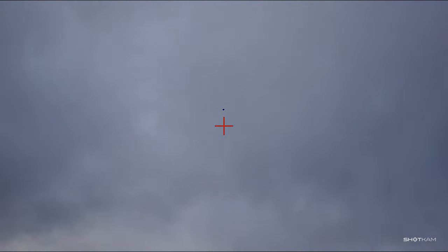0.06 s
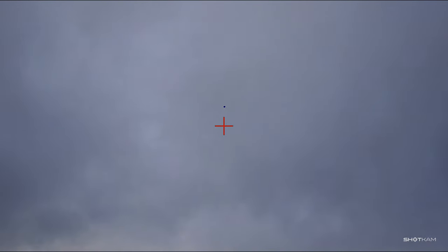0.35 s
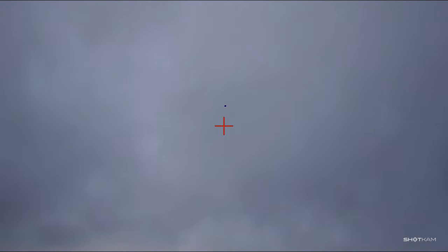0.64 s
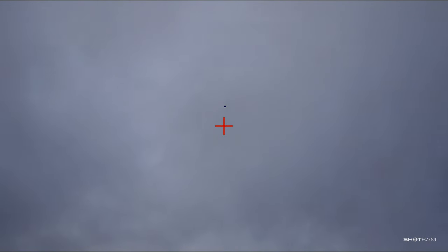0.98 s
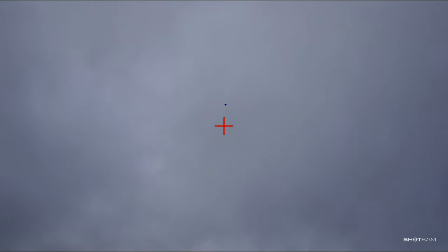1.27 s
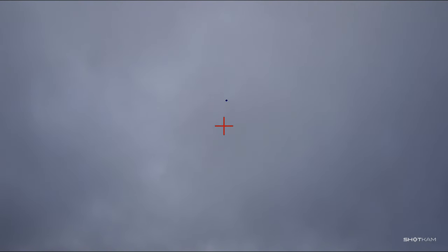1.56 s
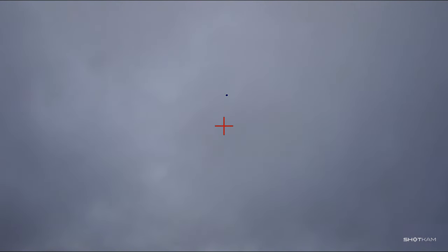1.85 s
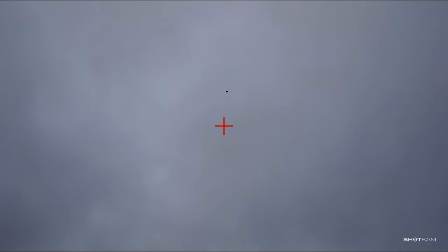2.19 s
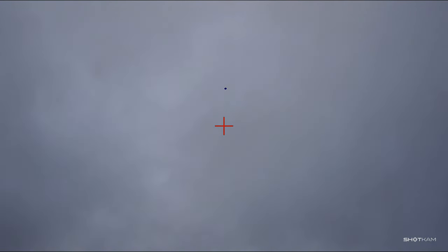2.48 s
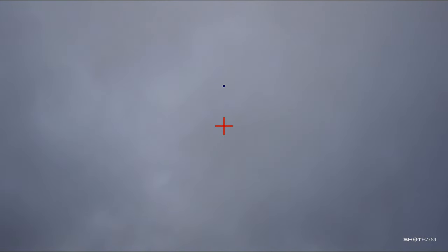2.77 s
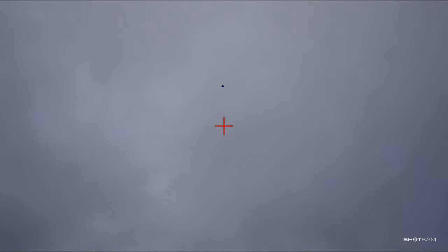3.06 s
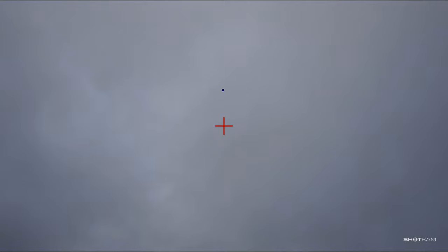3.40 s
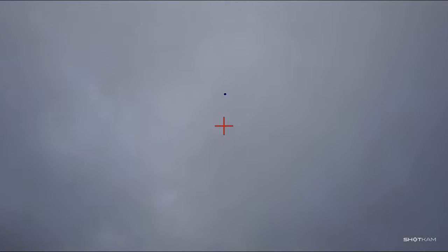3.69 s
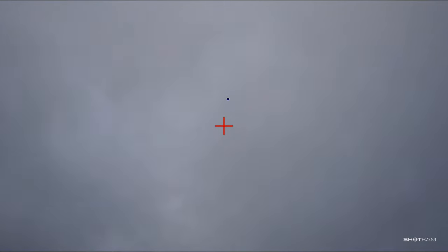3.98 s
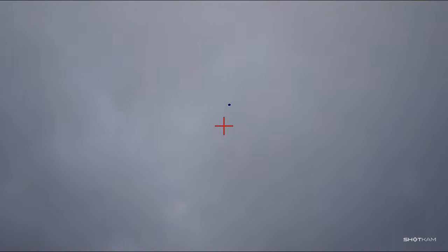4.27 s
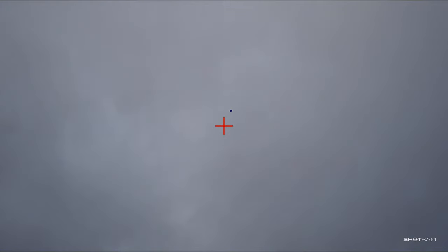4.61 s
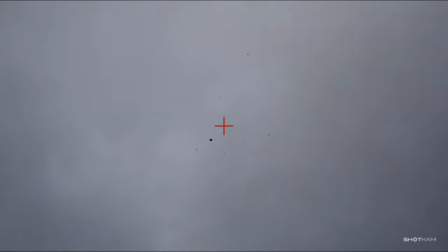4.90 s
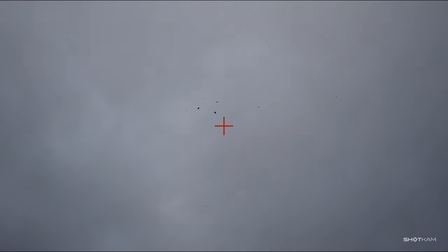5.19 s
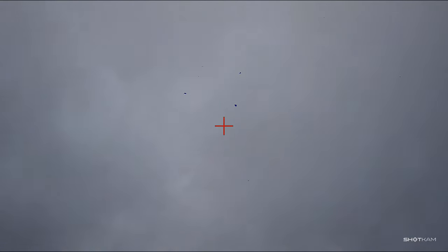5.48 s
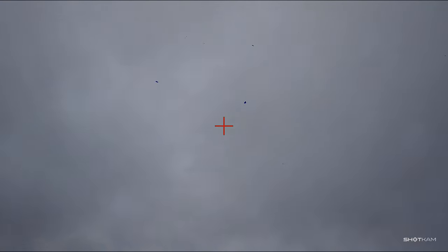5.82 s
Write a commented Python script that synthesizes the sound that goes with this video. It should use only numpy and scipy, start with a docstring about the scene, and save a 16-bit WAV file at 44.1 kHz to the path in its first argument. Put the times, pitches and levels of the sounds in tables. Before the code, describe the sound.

For the first five seconds or so it is very quiet outdoors: only faint, irregular puffs of wind rumbling on the microphone, with a low hum that swells and fades along with them. The microphone sits right on the barrel of a shotgun. At about 5 seconds the gun fires once, a sudden, very loud blast that overloads and distorts, with a deep recoil thump and a quick metallic rattle packed into it. A thin metallic ring from the barrel hangs on for nearly a second, while the report echoes over open land and comes back as a dull, distant roll. From about 5.2 seconds the wind and hum return slightly stronger beneath the fading echo. At around 5.8 seconds the gun's action gives one short clack, much weaker than the shot.

```python
"""Faint puffs of wind and a low hum, then one shotgun shot in open country.
The microphone is in a small camera clamped to the barrel; wind buffets it and hums in the clamp.
The hammer falls, and blast and recoil overload the input. The barrel rings on over the echo
of the land, and the action clacks once more."""
import sys
import numpy as np
from scipy import signal
from scipy.fft import rfft, irfft, next_fast_len
from scipy.io import wavfile

SR = 44100
rng = np.random.default_rng(int(sys.argv[2]) if len(sys.argv) > 2 else 0)


def int16_out(signal):
    """Quantize to a 16-bit WAV file."""
    q = np.round(np.clip(np.atleast_2d(signal).T, -1, 1) * 32767)
    wavfile.write(sys.argv[1], SR, q.astype(np.int16))


N = 257984
SHOT_S = 4.9555
AGE_S = np.arange(SR) / SR  # time since a blow


def amp(db):
    """Decibels to gain."""
    return 10 ** (np.asarray(db) / 20)


def along(points, hz):
    """Interpolate (f/Hz, value) points on a log frequency axis."""
    f, v = np.transpose(points)
    return np.interp(np.log(hz + 1), np.log(f), v)


def filtered(x, response):
    """Zero-phase filter with gain response(hz)."""
    size = next_fast_len(len(x) + SR // 2)
    hz = np.fft.rfftfreq(size, 1 / SR)
    return irfft(rfft(x, size) * response(hz), size)[:len(x)]


def noise(spectrum, size):
    """Coloured noise of rms 1; the spectrum sets its shape only."""
    x = filtered(rng.standard_normal(size), lambda hz: amp(along(spectrum, hz)))
    return x / np.sqrt(np.mean(x ** 2) + 1e-20)


def rise(rise_s):
    """Smooth onset from 0 to 1."""
    return 1 - np.exp(-(AGE_S / rise_s) ** 2)


def fade(t60_s):
    """Decay of 60 dB in t60_s."""
    return np.exp(-np.log(1000) * AGE_S / t60_s)


def ring(modes):
    """Free ringing of a struck part: a sum of damped sines."""
    return sum(amp(db) * fade(t60_s) * np.sin(2 * np.pi * hz * AGE_S) for hz, db, t60_s in modes)


def at(start_s, sound):
    """Place a sound on the scene's timeline."""
    return np.pad(sound, (round(start_s * SR), N))[:N]


def wind(breeze_db=-79, attack_s=0.028, buffet_fall_db_per_s=94, hum_fall_db_per_s=89):
    """Puffs on the swinging gun swell, hold and die, buffeting the port and humming in the clamp."""
    # puffs of air: start/s, length/s, buffet/dB, hum/dB
    gusts = [(-0.04, 0.79, -52.5, -63), (0.34, 0.087, -50, -50.5), (0.969, 0.3, -62, -59.5),
             (1.317, 0.11, -52, -64), (1.551, 0.33, -56.5, -61), (2.589, 0.18, -62, -82.5),
             (2.75, 0.36, -58.5, -91.5), (3.066, 0.31, -52.5, -84.5), (3.453, 0.068, -57, -100),
             (3.739, 0.13, -48, -66), (4.016, 0.079, -45, -71), (4.463, 0.054, -61, -105),
             (5.21, 0.15, -45, -42.5), (5.43, 0.09, -43.5, -41.5), (5.547, 0.082, -39.5, -50.5)]
    # turbulence at the microphone port: f/Hz, level/dB
    buffet_spectrum = [(5, -4.5), (12, -2), (25, -5.5), (45, -10.5), (80, -27.5), (120, -45), (250, -73),
                       (500, -120)]
    # clamp hum: f/Hz, level/dB
    hum_spectrum = [(60, -37.5), (110, -11.5), (150, -8.5), (180, 7.5), (200, -1.5), (235, -44), (320, -61),
                    (600, -120)]
    t = np.arange(N) / SR
    buffet, hum = np.full(N, amp(breeze_db)), np.zeros(N)
    for start_s, length_s, buffet_db, hum_db in gusts:
        swell = np.clip((t - start_s) / attack_s, 0, 1) ** 2
        since_end_s = np.maximum(t - start_s - length_s, 0)
        buffet = np.maximum(buffet, swell * amp(buffet_db - buffet_fall_db_per_s * since_end_s))
        hum = np.maximum(hum, swell * amp(hum_db - hum_fall_db_per_s * since_end_s))
    return buffet * noise(buffet_spectrum, N) + hum * noise(hum_spectrum, N)


def action(scrape_t60_s=0.042, thud_db=-13, thud_t60_s=0.12, contact_s=0.00085):
    """Each contact rings the action, thuds through the stock and adds a short scrape of steel."""
    # single contacts in lock and action: t/s, knock/dB, scrape/dB
    contacts = [(.378, -68, -120), (4.9408, -18, -34), (4.9475, 1.5, -36), (4.9565, 10, 3), (5.0185, -7, 5),
                (5.108, -27, -68), (5.692, -53.5, -77)]
    # action modes: f/Hz, level/dB, t60/s
    modes = [(246.5, -15, 0.15), (375, -12, 0.01), (445, -15.5, 0.049), (566.5, -6.5, 0.056),
             (636.6, 1.5, 0.053), (750, -14, 0.091), (930, -23, 0.07), (1770, -28.5, 0.034),
             (2130, -26, 0.054), (2680, -32.5, 0.082), (3570, -35.5, .035), (4280, -39.5, 0.049),
             (5554, -41, 0.025)]
    # stock thud: f/Hz, level/dB
    thud_spectrum = [(150, -5.5), (600, 3.5), (850, -2), (1400, -21.5), (1900, -12.5), (2800, -26),
                     (4000, -41.5), (7000, -64)]
    # steel scrape: f/Hz, level/dB
    scrape_spectrum = [(150, -16.5), (600, 1), (1000, 13.5), (1450, -12), (2200, 1), (3200, -6.5),
                       (4500, -6), (7000, -17), (10000, -47)]
    ringing = ring(modes)
    out = np.zeros(N)
    for t_s, knock_db, scrape_db in [*contacts, *chatter()]:
        knock = ringing + amp(thud_db) * fade(thud_t60_s) * noise(thud_spectrum, SR)
        scrape = fade(scrape_t60_s) * noise(scrape_spectrum, SR)
        out += at(t_s, rise(contact_s) * (amp(knock_db) * knock + amp(scrape_db) * scrape))
    return out


def jolts(contact_s=0.00039):
    """Handling and recoil ring the camera housing and, lower in pitch, its clamp."""
    # blows to the camera: t/s, housing/dB, clamp/dB
    blows = [(.379, -105, -62), (4.9555, 5, -1.5), (4.9632, 18, -4.5), (4.973, 22, -4.5), (4.9905, 22, -2),
             (5.0105, -16.5, 7), (5.2245, -23.5, -34)]
    # housing modes: f/Hz, level/dB, t60/s
    housing_modes = [(838, -14, 0.02), (981.3, 1.5, 0.028), (1028, -11, 0.016), (1281, -21.5, 0.077),
                     (2000, -27, 0.043)]
    # clamp modes: f/Hz, level/dB, t60/s
    clamp_modes = [(78, -8.5, 0.19), (177.4, 3.5, 0.13), (247, -6, 0.049), (290.7, -11, 0.052),
                   (379.2, -12.5, 0.072)]
    housing = rise(contact_s) * ring(housing_modes)
    clamp = rise(contact_s) * ring(clamp_modes)
    return sum(at(t_s, amp(housing_db) * housing + amp(clamp_db) * clamp)
               for t_s, housing_db, clamp_db in blows)


def shot(blast_db=15, blast_t60_s=0.13, kick_s=4.977):
    """The muzzle blast roars and rings the barrel; then the gun kicks into the shoulder."""
    # muzzle blast: f/Hz, level/dB
    blast_spectrum = [(30, -10), (110, -2), (200, 1.5), (280, 5), (420, -2.5), (700, -18.5), (1200, -18.5),
                      (3000, -22.5), (7000, -28.5), (12000, -56.5)]
    # barrel modes: f/Hz, level/dB, t60/s
    barrel_modes = [(1132.7, -12.5, 0.91), (1130, -19, 0.65), (610, -31, 0.3), (835, -43, .5),
                    (950, -41.5, 0.44), (2300, -57, .9), (2696, -56.5, .65)]
    # whole gun kicking back: f/Hz, level/dB, t60/s
    kick_modes = [(27.3, 21.5, 0.1), (40.2, 3, 0.28)]
    blast = amp(blast_db) * fade(blast_t60_s) * noise(blast_spectrum, SR)
    return at(SHOT_S, blast + ring(barrel_modes)) - at(kick_s, ring(kick_modes))


def echo(level_db=-36):
    """Nearby land scatters the report back; each band decays at its own rate."""
    # scattered report: f/Hz, level/dB
    spectrum = [(40, -5), (280, 2), (420, -7.5), (600, -13.5), (760, 0), (1250, -6.5), (1550, -19),
                (2300, -6.5), (3000, -15), (3700, -23), (5800, -26.5), (8000, -41), (12000, -66.5)]
    # decay over the land: f/Hz, t60/s
    land_decay = [(300, 1.4), (520, 0.59), (780, 0.91), (1300, 1.5), (2300, 1.1), (4500, 1.05), (9000, 1.3)]
    hz, t, bands = signal.stft(noise(spectrum, SR), SR, nperseg=256)
    decay = amp(-60 * t / along(land_decay, hz)[:, None])
    _, tail = signal.istft(bands * decay, SR, nperseg=256)
    return at(SHOT_S, amp(level_db) * tail)


def chatter(hits=3, first_gap_s=0.0078, scrape_loss_db=5):
    """Contacts of the action slamming against a stop and rebounding at widening gaps."""
    # slams: t/s, knock/dB, scrape/dB, knock loss per rebound/dB, ratio of successive gaps
    slams = [(5.0485, -25.5, -8, -0.5, 2.23), (5.2245, -38.5, -51.5, 4.5, 1.43),
             (5.7528, -16.5, -50, 9, 1.5)]
    contacts = []
    for t_s, knock_db, scrape_db, knock_loss_db, gap_ratio in slams:
        for k in range(hits):
            contacts.append((t_s, knock_db - knock_loss_db * k, scrape_db - scrape_loss_db * k))
            t_s += first_gap_s * gap_ratio ** k
    return contacts


def roll(start_s=5.24, level_db=-41, swell_s=0.22, t60_s=1.0):
    """Far ground answers late with a dull, swelling roll."""
    # distant echo: f/Hz, level/dB
    spectrum = [(60, -17.5), (180, -6), (330, -0.5), (430, -21), (560, -34.5), (760, 0.5), (950, -25.5),
                (2000, -19.5), (3200, -27), (6000, -77.5)]
    return at(start_s, amp(level_db) * rise(swell_s) * fade(t60_s) * noise(spectrum, SR))


def scene():
    """Gun, land and wind at one microphone."""
    return (shot() + jolts() + action() + echo() + roll() + wind())[None]


def record(dry, rail=0.77, hiss_db=-97, cutoff_hz=16600):
    """The input clips at its rails; the camera then dulls the treble and adds faint hiss."""
    # microphone response: f/Hz, gain/dB
    response = [(10, -0.3), (3000, -1.5), (5000, -2), (7000, -3.5), (8000, -7), (9200, -19), (12000, -12),
                (15000, -12), (16500, -27)]
    # camera hiss: f/Hz, level/dB
    hiss_spectrum = [(100, 1), (500, -2), (1500, -7.5), (5500, -7), (8000, -11), (14000, -15), (17000, -22)]
    oversampled = signal.resample_poly(dry[0], 4, 1)  # limits aliasing from the clipping
    clipped = signal.resample_poly(np.clip(oversampled, -rail, rail), 1, 4)
    dulled = filtered(clipped, lambda hz: amp(along(response, hz)))
    hiss = amp(hiss_db) * noise(hiss_spectrum, N)
    return filtered(dulled + hiss, lambda hz: hz < cutoff_hz)[None]


dry = scene()
out = record(dry)
int16_out(out)
```